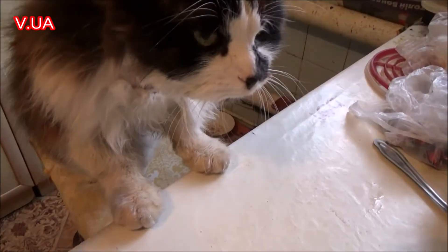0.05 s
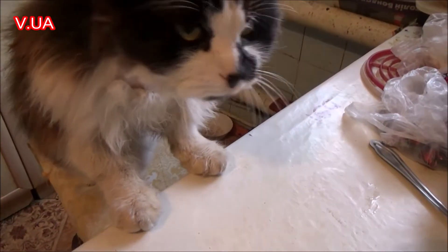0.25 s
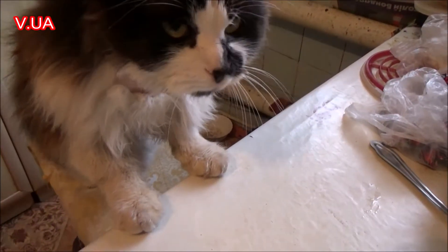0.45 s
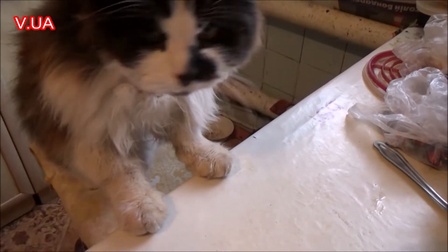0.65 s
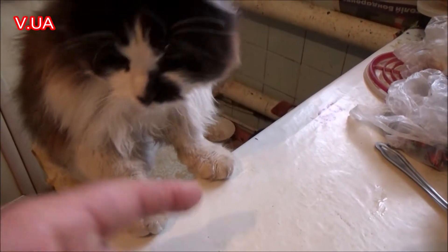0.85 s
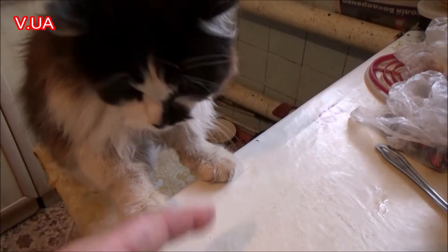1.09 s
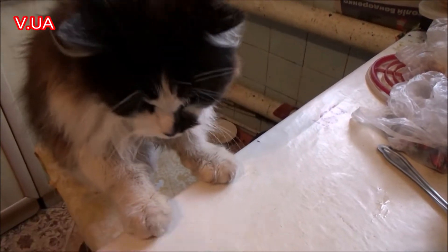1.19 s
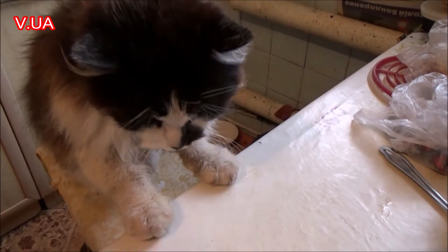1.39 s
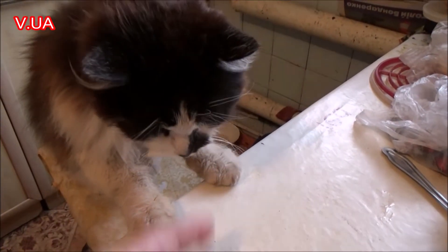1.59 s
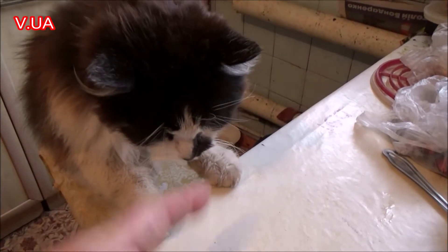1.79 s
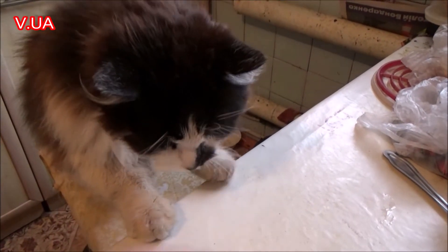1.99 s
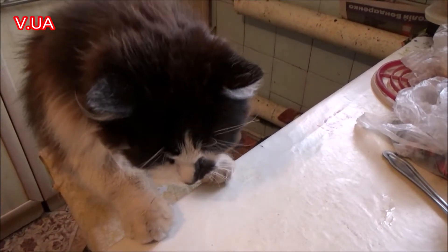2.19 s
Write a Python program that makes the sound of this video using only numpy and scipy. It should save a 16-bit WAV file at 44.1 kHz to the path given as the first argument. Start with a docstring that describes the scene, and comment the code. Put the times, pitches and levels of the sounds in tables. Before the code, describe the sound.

A hand pats a table eight times, deep and soft at first, then with sharper fingers.

```python
"""Three soft, deep pats of a hand on a kitchen table, then five firmer ones with the fingers,
coming a little faster as they go. Each pat is a sharp smack of fingertips on the smooth top
and a thud of the board, which rings on while loose things on it buzz faintly.
The small room answers briefly over a faint steady noise."""
import sys
import numpy as np
from scipy import signal
from scipy.fft import rfft, irfft
from scipy.io import wavfile
from scipy.ndimage import uniform_filter1d, minimum_filter1d

SR = 44100
rng = np.random.default_rng(int(sys.argv[2]) if len(sys.argv) > 2 else 0)


def dump_mix(stems):
    """Bounce the given channels to the path in sys.argv[1] as a 16-bit WAV at rate SR."""
    frames = np.atleast_2d(stems).T  # one column per channel
    limited = np.clip(frames, -1, 1)  # hard clip at full scale
    pcm = np.round(limited * 32767).astype(np.int16)
    wavfile.write(sys.argv[1], SR, pcm)


N = 99225

# The hand landing; the third and last pats touch twice:
# start_s, flat_hand_db, fingers_db, contact_cutoff_hz, buzz_db
PATS = [(0.2465, 1, -15, 1160, -38.5), (0.5148, -3, -24, 1100, -88), (0.7616, -6.5, -12, 1110, -36.5),
        (0.7726, -9, -13.5, 2840, -33), (1.0261, -29, -10, 1110, -45.5), (1.2580, -26, -5.5, 1630, -42),
        (1.4794, -20, -3.5, 2020, -38.5), (1.7020, -21, -4, 2070, -50), (1.9108, -6, 0, 3200, -31),
        (1.9233, -9.5, -14.5, 1390, -32.5)]


def from_db(db):
    """Decibels to gain."""
    return 10 ** (np.asarray(db) / 20)


def at_hz(points, hz):
    """Read a curve on a log-frequency axis."""
    freqs, values = np.transpose(points)
    return np.interp(np.log(np.maximum(hz, 1)), np.log(freqs), values)


def filtered(x, hz, kind, order=2):
    """Causal Butterworth filter."""
    sos = signal.butter(order, np.clip(hz, 10, .45 * SR), kind, fs=SR, output="sos")
    return signal.sosfilt(sos, x + 1e-18)


def coloured(x, spectrum):
    """Shape noise with an EQ curve."""
    hz = np.fft.rfftfreq(x.shape[-1], 1 / SR)
    return irfft(rfft(x) * from_db(at_hz(spectrum, hz)), x.shape[-1])


def diffuse(size):
    """Stereo noise, widest in the upper mids, narrow in the bass and at the very top."""
    # Stereo width: freq_hz, side_to_mid_db
    width = [(60, -8), (150, -20), (350, -9), (800, -3), (2500, -0.5), (8000, -6), (14000, -32.5)]
    mid, side = rng.standard_normal((2, size))
    return mid + coloured(side, width) * [[1], [-1]]


def decay(t, t60_s):
    """Exponential fade, 60 dB down after t60_s."""
    return np.exp(-np.log(1000) * t / t60_s)


def add(out, start_s, sound):
    """Mix a sound in at a time."""
    i = int(start_s * SR)
    out[..., i:i + sound.shape[-1]] += sound[..., :N - i]


def panned(x, left_db):
    """Mono to stereo, the left side left_db above the right."""
    return x * from_db([[left_db / 2], [-left_db / 2]])


def room_tone():
    """Faint, steady, dark noise of the room."""
    # Colour of the noise: freq_hz, level_db
    spectrum = [(20, -1), (60, -2.5), (130, 0), (220, 1), (400, -9.5), (650, -8), (1200, -14.5),
                (3000, -18.5), (8000, -21), (12000, -20.5), (16000, -20)]
    noise = coloured(diffuse(N), spectrum)
    return from_db(-53) * noise / noise.std()


def fingertip_smacks():
    """Each fingertip gives a bright click of two or three cycles and a crackle as the skin settles."""
    # Fingertips meeting the top: start_s, click_db, pitch_hz, crackle_db
    touches = [(0.2454, -1.5, 6550, -17), (.2535, -18, 6500, -24), (0.2602, -8, 6800, -21),
               (0.5133, -3, 6560, -12), (0.5318, -13, 7400, -51), (0.7636, -4.5, 6960, -20),
               (.7730, -11.5, 5800, -17), (1.026, 2, 7500, -20.5), (1.0373, -24, 7700, -31),
               (1.2577, -7.5, 7750, -42), (1.2581, -1.5, 7600, -18.5), (1.478, -23, 7000, -15),
               (1.4798, -5, 7670, -12.5), (1.7015, -5, 7260, -18.5), (1.7015, -6.5, 7600, -27),
               (1.9112, -12, 7530, -7), (1.9105, -25, 7200, -15.5)]
    band_ratio = 1.323
    out, t = np.zeros(N), np.arange(SR // 20) / SR
    for start_s, click_db, pitch_hz, crackle_db in touches:
        contact = from_db(crackle_db) * rng.standard_normal(len(t)) * decay(t, t60_s=0.0088)
        contact[0] = 2 * from_db(click_db)
        snap = filtered(contact, [pitch_hz / band_ratio, pitch_hz * band_ratio], "band")
        body = filtered(filtered(contact, 3000, "high", order=1), 11200, "low")
        add(out, start_s, from_db(0.5) * (snap + from_db(-3.5) * body))
    return out


def table_thuds():
    """The flat hand pushes and the fingers knock the board's modes; a softer contact dulls the top."""
    # Broad, quickly damped bending under the hand: pitch_hz, t60_s, by_hand_db, by_fingers_db
    thud_modes = [(86, .06, -5.5, -37), (139, 0.036, 0.5, -22.5), (201, 0.026, -4, -47),
                  (311, 0.12, -22.5, -23.5), (372, 0.052, -54, -13), (519, 0.041, -29, -20),
                  (736.7, 0.041, -17.5, -18), (805, 0.045, -17, -31.5), (977, 0.019, -18, -12.5),
                  (1110, 0.012, -17, -18), (1400, 0.014, -41, -16.5), (2053, 0.009, -35, -18),
                  (2960, 0.0042, -38, -14)]
    # Lasting ring of the table: pitch_hz, t60_s, by_hand_db, by_fingers_db
    ring_modes = [(49.6, 0.53, -29.5, -31), (68, 0.34, -23, -53), (130.9, 0.38, -28.5, -28.5),
                  (194, 0.24, -25, -44.5), (238.7, 0.31, -18.5, -44), (269.4, 0.27, -21.5, -56),
                  (301.7, 0.24, -23, -23.5), (336.2, 0.34, -31.5, -27.5), (356.5, 0.25, -39, -27.5),
                  (416.6, 0.37, -37.5, -36.5), (622, 0.25, -39, -35), (667, 0.31, -46, -34.5),
                  (776, 0.084, -36, -64), (942.6, 0.09, -50, -29.5)]
    modes = thud_modes + ring_modes
    # The upper ring differs in phase between left and right; the bass reaches both alike.
    spread_rad, full_spread_hz = 0.39, 285
    spreads = [0] * len(thud_modes)
    for k, (hz, *_) in enumerate(ring_modes):
        spreads.append(spread_rad * (-1) ** k * min(hz / full_spread_hz, 1) ** 2)
    hand_rise_s, scatter_db = 0.0028, 2.5
    out, t = np.zeros((2, N)), np.arange(SR // 2) / SR
    for start_s, hand_db, fingers_db, cutoff_hz, _ in PATS:
        board = 0
        for (hz, t60_s, by_hand_db, by_fingers_db), spread in zip(modes, spreads):
            push = from_db(hand_db + by_hand_db) * (1 - np.exp(-t / hand_rise_s))
            knock = from_db(fingers_db + by_fingers_db)
            wave = np.sin(2 * np.pi * hz * t + np.array([[spread / 2], [-spread / 2]]))
            spot_gain = from_db(scatter_db * rng.standard_normal())  # no two pats hit the same spot
            board = board + spot_gain * (push + knock) * wave * decay(t, t60_s)
        add(out, start_s, -filtered(board, cutoff_hz, "low", order=1))
    return out


def kitchen_reverb(x, spectrum):
    """Dense reflections build fast and die band by band; the treble swells again off the far wall."""
    # Decay of the room: freq_hz, t60_s
    decay_times = [(60, 0.54), (400, 0.27), (1200, 0.37), (3000, 0.22), (8000, 0.26), (15000, 0.25)]
    onset_s, wall_delay_s, wall_smear_s = 0.0017, 0.0414, 0.003
    t = np.arange(SR // 2) / SR
    hz = np.fft.rfftfreq(len(t), 1 / SR)
    noise_bins = rfft(coloured(diffuse(len(t)), spectrum))
    build_up = 1 - np.exp(-(t / onset_s) ** 2)
    wall_echo = from_db(-5) * np.exp(-((t - wall_delay_s) / wall_smear_s) ** 2)
    octaves_hz, response = 20 * 2. ** np.arange(11), 0
    for low, high in zip(octaves_hz, octaves_hz[1:]):
        band = irfft(noise_bins * ((hz >= low) & (hz < high)), len(t))
        t60_s = at_hz(decay_times, np.sqrt(low * high))
        envelope = decay(t, t60_s) * build_up * (1 + wall_echo * (low > 4000))
        response = response + band * envelope / np.linalg.norm(envelope)
    return signal.fftconvolve(x[None], response, axes=1)[:, :N]


def loose_things_buzz():
    """Loose things on the table chatter and clink just after each pat."""
    # Colour of the chatter: freq_hz, level_db
    spectrum = [(200, -52), (500, 16), (1000, 1.5), (2000, 3.5), (3500, -2.5), (7000, -9.5), (15000, -15)]
    # Ring of the loose things: pitch_hz, level_db
    partials = [(1755, -4.5), (1863, -7), (2026, -14), (2326, -43), (2573, -50)]
    delay_s = 0.0034
    out, t = np.zeros((2, N)), np.arange(SR // 2) / SR
    for start_s, *_, buzz_db in PATS:
        grains = coloured(diffuse(len(t)) * rng.exponential(1, len(t)), spectrum)
        chatter = grains / grains.std() * decay(t, t60_s=0.29)
        tones = sum(from_db(db) * np.sin(2 * np.pi * (hz * t + rng.random())) for hz, db in partials)
        clink = tones * decay(t, t60_s=0.14)
        add(out, start_s + delay_s, from_db(buzz_db) * (chatter + clink))
    return out


def finger_grazes():
    """Skin sliding on the smooth top gives a short, faint hiss."""
    # A finger brushing the top just before the hand lands: start_s, level_db
    brushes = [(.758, -29.5), (1.469, -37), (1.691, -30.5)]
    out, size = np.zeros(N), int(0.0071 * SR)
    for start_s, level_db in brushes:
        add(out, start_s, from_db(level_db) * rng.standard_normal(size) * np.sqrt(np.hanning(size)))
    return filtered(out, [3600, 13000], "band")


def gain_control(x):
    """Loud thuds pull the gain down; it stays down and sinks slowly throughout."""
    threshold_db, sink_db_per_s, window = -8, 0.5, int(0.012 * SR)
    power = uniform_filter1d(np.mean(x ** 2, axis=0), window)
    over_db = np.maximum(10 * np.log10(np.maximum(power, 1e-12)) - threshold_db, 0)
    drift_db = -sink_db_per_s * np.arange(N) / SR
    gain_db = drift_db - np.maximum.accumulate(over_db + drift_db)
    smooth_db = uniform_filter1d(minimum_filter1d(gain_db, 2 * window), window)
    return x * from_db(smooth_db)


def scene():
    """The table close by, with the kitchen around it."""
    # Reverb colour for the thuds: freq_hz, level_db
    thud_send = [(40, -28), (120, -13.5), (300, -5), (600, -7), (1200, -12.5), (3000, -5), (10000, -42)]
    # Reverb colour for the smacks and grazes: freq_hz, level_db
    skin_send = [(500, 21), (2000, -10), (4000, -11.5), (7000, -15.5), (10000, -13.5), (15000, -13)]
    thuds = table_thuds()
    skin = fingertip_smacks() + finger_grazes()
    direct = panned(thuds, left_db=-1.0) + panned(skin, left_db=2.8)
    reverb = kitchen_reverb(thuds.mean(axis=0), thud_send) + kitchen_reverb(skin, skin_send)
    return direct + reverb + loose_things_buzz() + room_tone()


def record(dry):
    """The microphone trims deep bass and top, the gain ducks, peaks clip and a steep low-pass follows."""
    mic = filtered(filtered(dry, 45, "high", order=4), 13000, "low")
    clipped = np.clip(gain_control(from_db(3.5) * mic), -.85, .85)
    top_cut = signal.ellip(10, .1, 80, 16000, fs=SR, output="sos")
    return signal.sosfilt(top_cut, clipped)


dry = scene()
out = record(dry)
dump_mix(out)
```